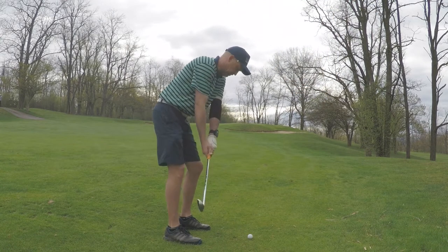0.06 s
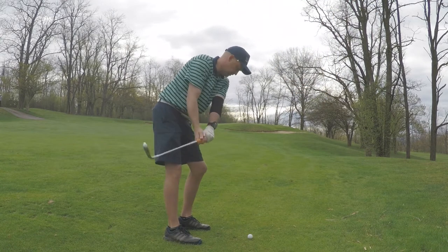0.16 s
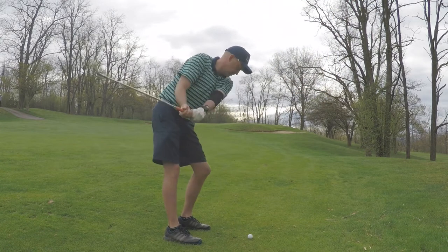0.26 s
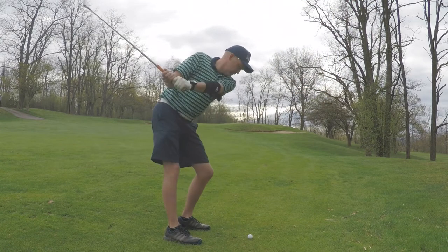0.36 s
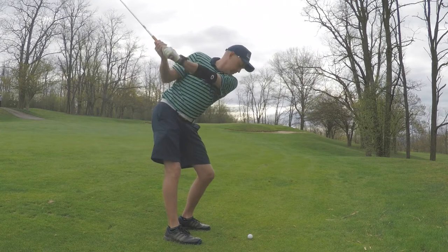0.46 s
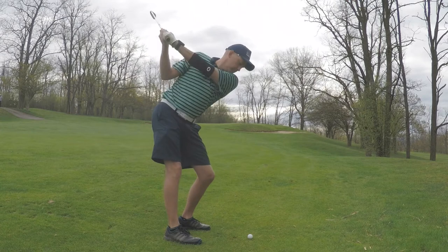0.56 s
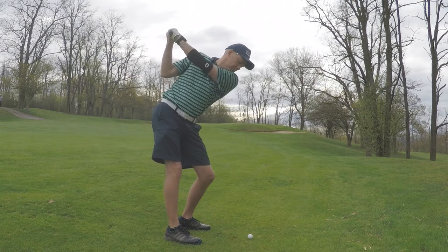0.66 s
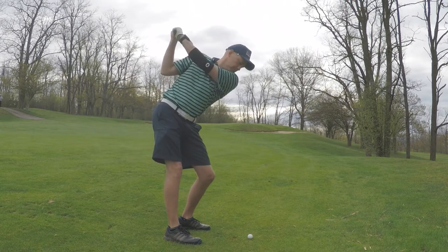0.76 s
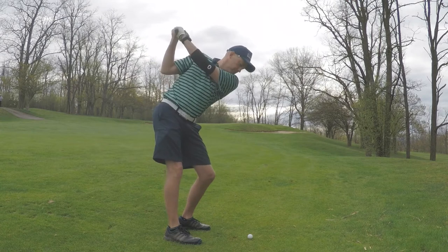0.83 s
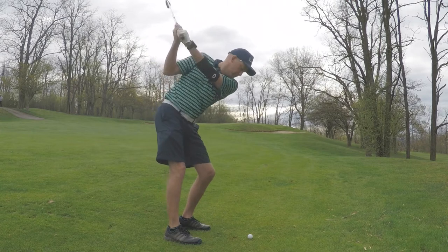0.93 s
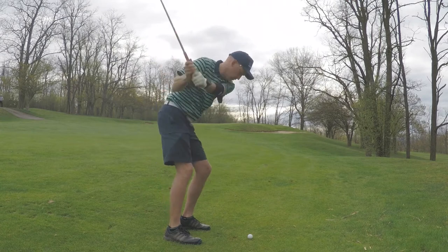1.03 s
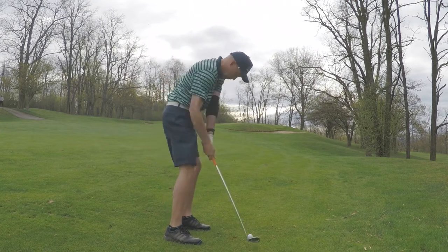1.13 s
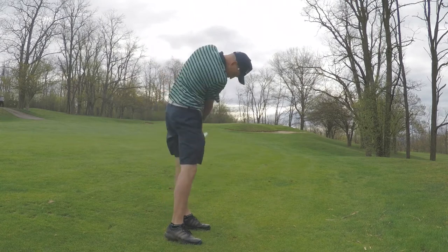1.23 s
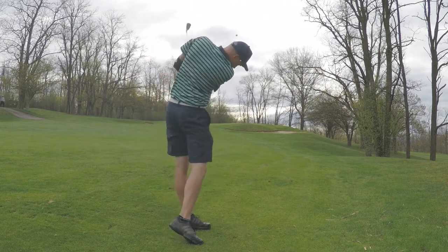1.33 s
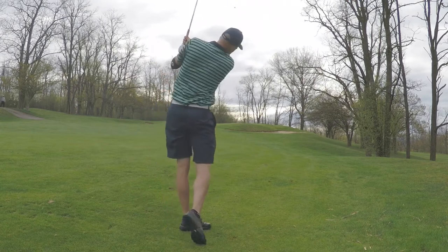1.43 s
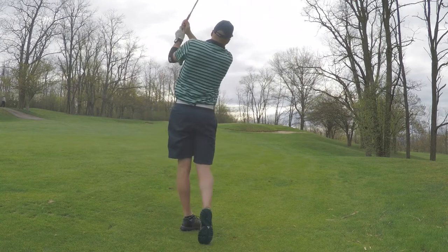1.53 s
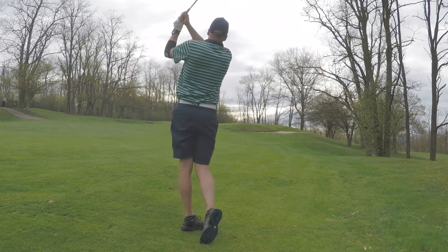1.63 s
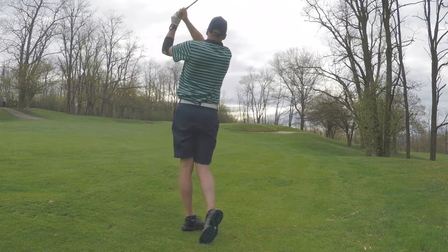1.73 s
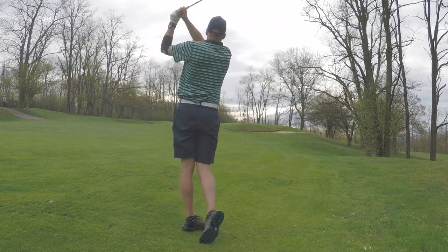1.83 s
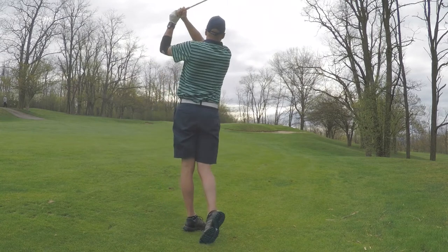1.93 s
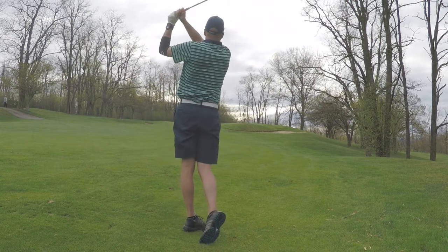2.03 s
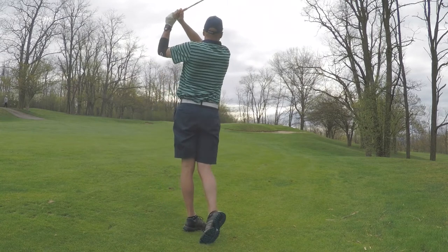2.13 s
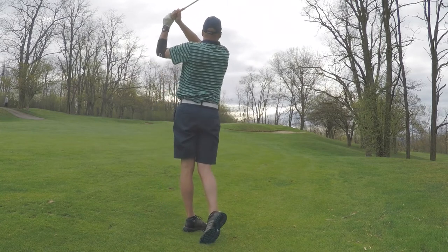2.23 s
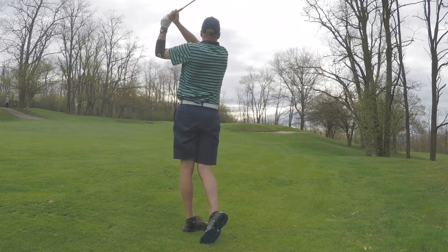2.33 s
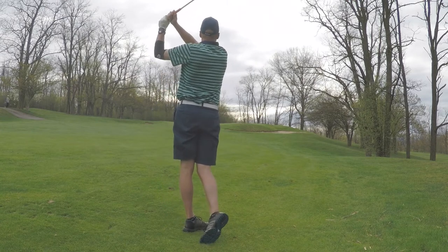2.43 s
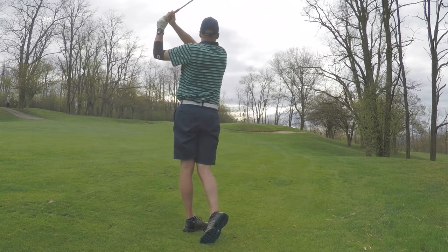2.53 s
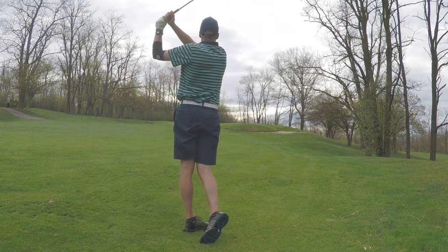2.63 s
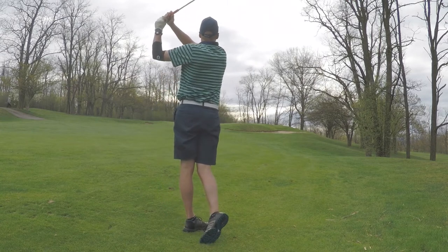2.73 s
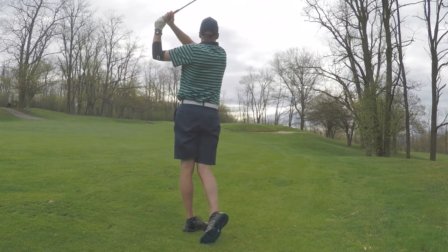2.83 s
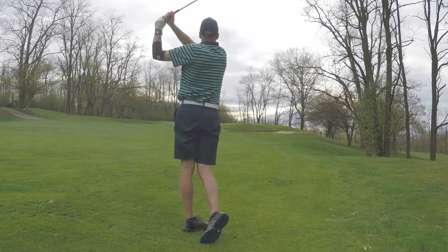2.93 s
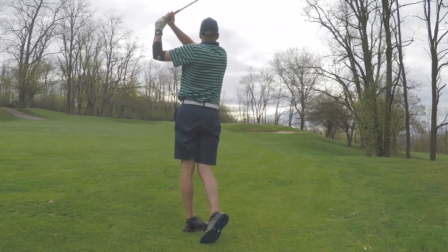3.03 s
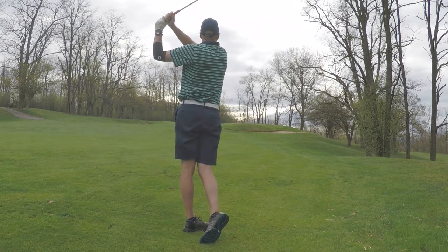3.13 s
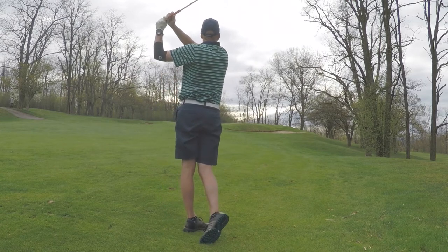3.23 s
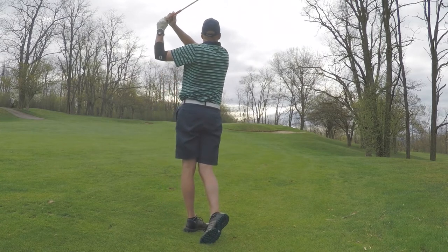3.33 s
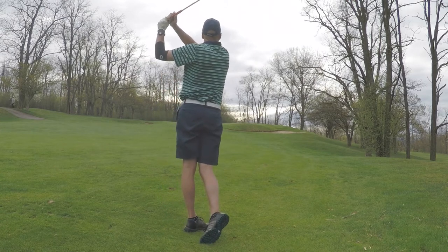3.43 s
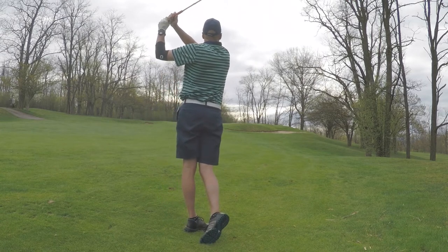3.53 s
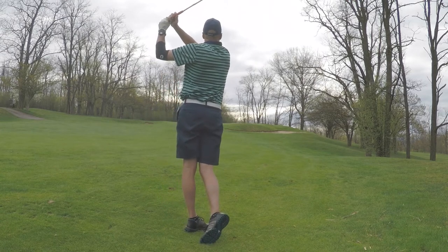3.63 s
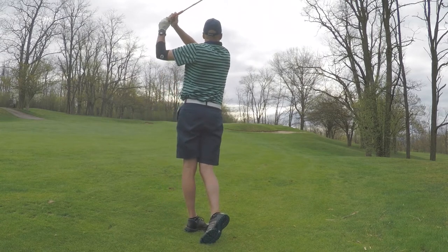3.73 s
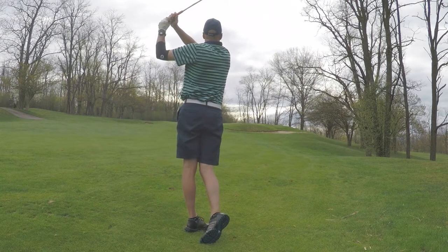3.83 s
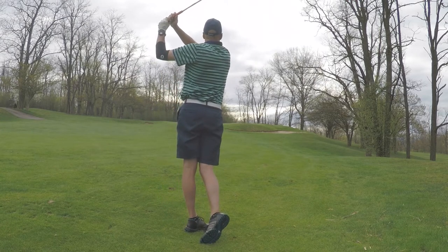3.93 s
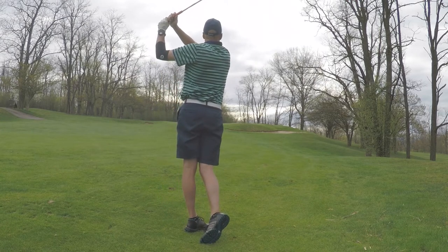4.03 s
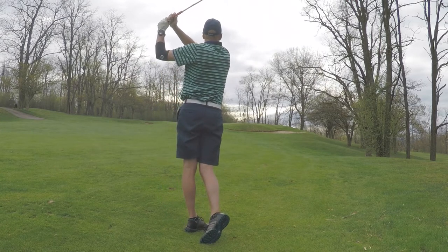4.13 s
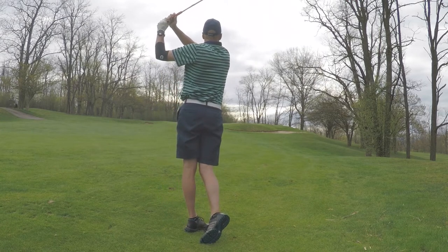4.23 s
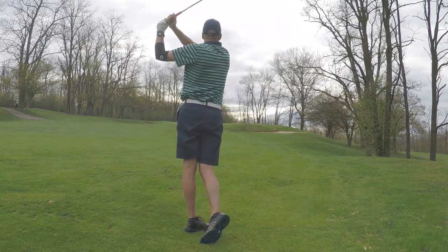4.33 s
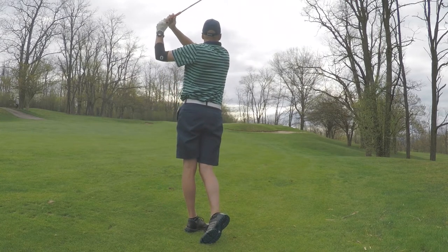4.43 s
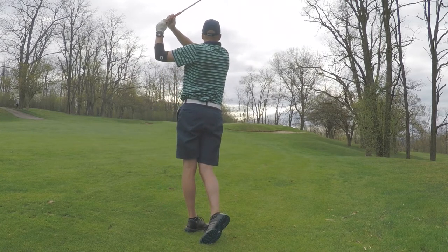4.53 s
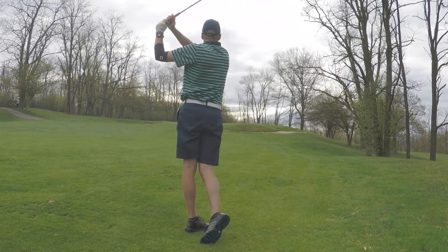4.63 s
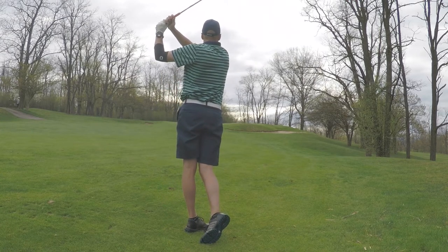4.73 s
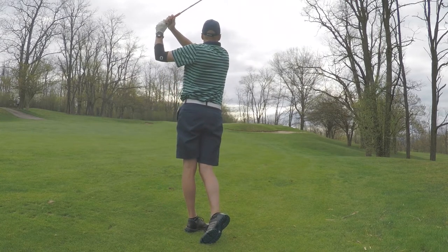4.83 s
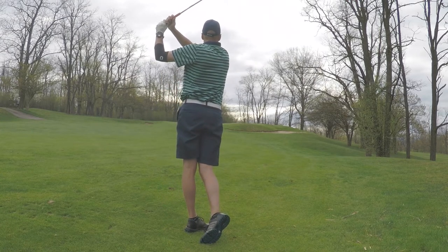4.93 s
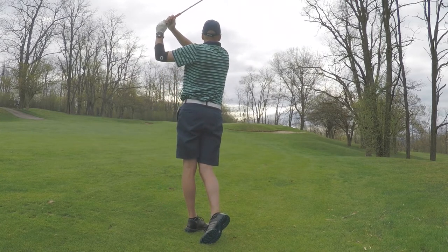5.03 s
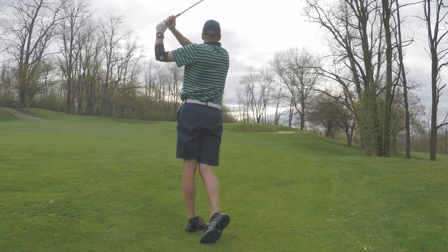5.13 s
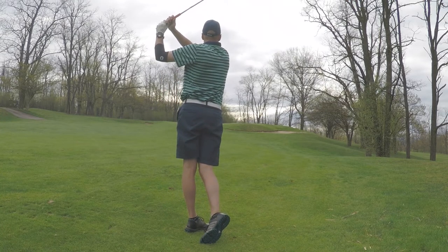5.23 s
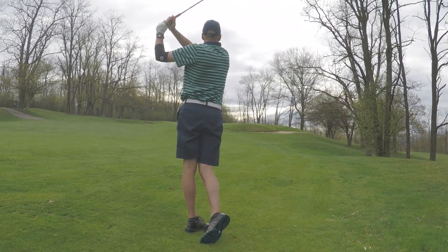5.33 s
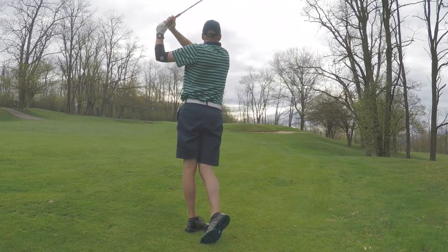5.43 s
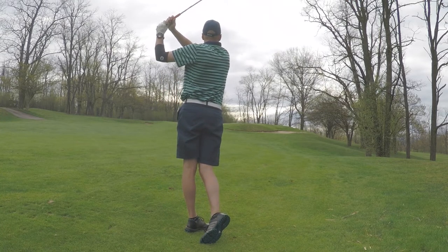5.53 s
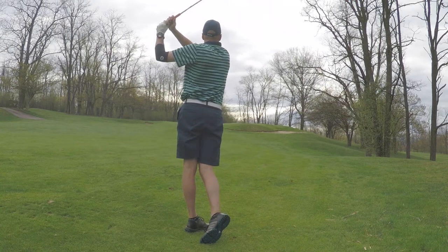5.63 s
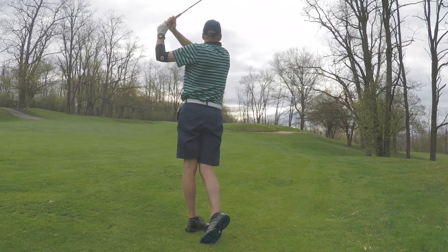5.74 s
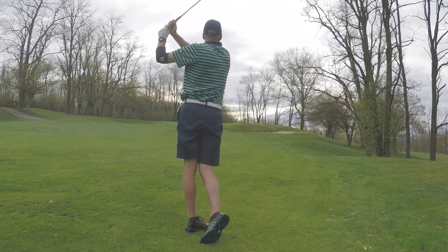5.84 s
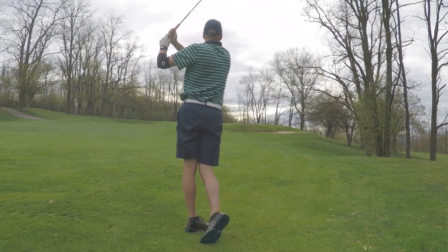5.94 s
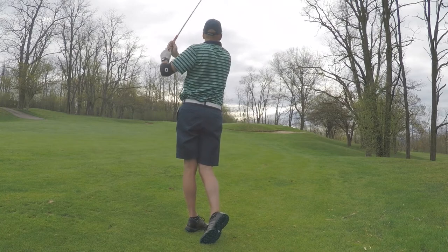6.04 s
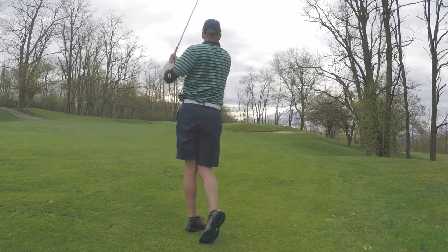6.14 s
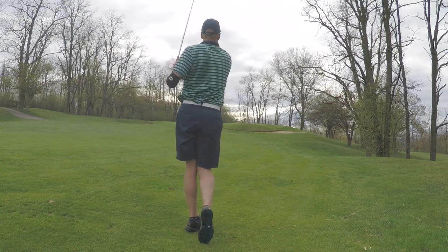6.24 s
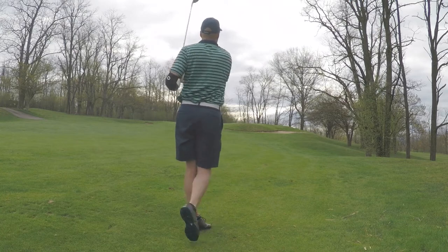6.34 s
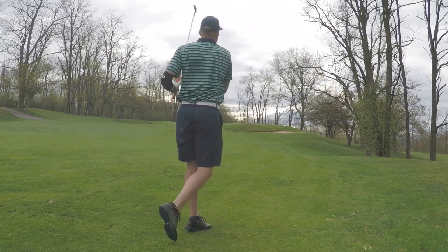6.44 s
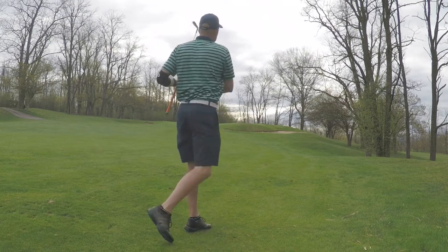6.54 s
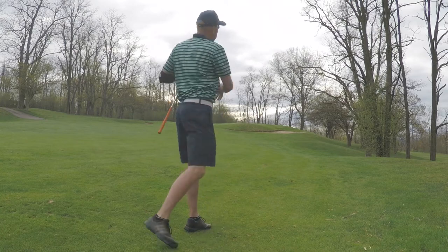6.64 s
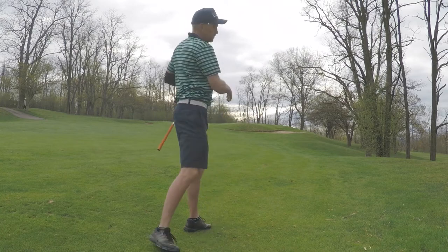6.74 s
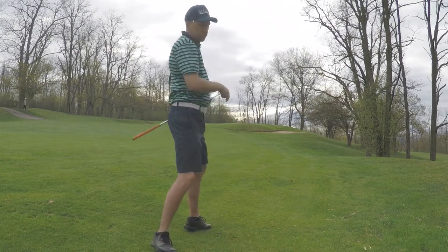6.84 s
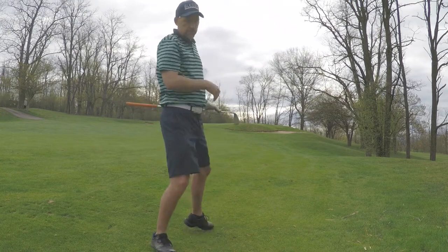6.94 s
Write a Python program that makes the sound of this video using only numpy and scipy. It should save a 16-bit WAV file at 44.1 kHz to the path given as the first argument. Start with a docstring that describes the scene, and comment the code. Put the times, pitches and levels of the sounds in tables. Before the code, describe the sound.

On a quiet open golf course, a quick swish ends in one hard, sharp click, followed by scattering turf, faint birds and distant engine drone.

```python
"""A swish and a hard click: a golf iron strikes a ball on an open fairway, a few metres from the microphones.
The contact is a shaped pulse plus decaying head modes; coloured noise makes the swish and the cut turf.
A low sine thumps, and grains of noise and single pulses make the spray and crumbs of soil and grass.
Birds are gliding sine notes, with far song and a faint echo among the trees. Off to the left, two far
engines, probably mowers, drone as wavering harmonics with two thin hums, under the noise of the open air."""
import sys
import numpy as np
from scipy import signal
from scipy.fft import rfft, irfft, next_fast_len
from scipy.io import wavfile
from scipy.ndimage import map_coordinates

SR = 44100
rng = np.random.default_rng(int(sys.argv[2]) if len(sys.argv) > 2 else 0)


def bounce(signal):
    """Save signal as a 16-bit WAV file at the path given by the first command-line argument."""
    frames = np.transpose(np.atleast_2d(signal))
    limited = np.clip(frames, -1, 1)
    pcm = np.round(limited * 32767).astype(np.int16)
    wavfile.write(sys.argv[1], SR, pcm)


N = 307377  # length in samples

IMPACT_S = 1.2101
# A faint early pulse, the full blow, then returns from ground and player:
# delay_s [s], relative level_db [dB]
PATHS = [(-.00045, -15.5), (0, 9), (.0018, -29), (.0030, -20), (.0041, -15), (.0076, -29)]
# Colour of the contact pulse: pitch_hz [Hz], relative density_db [dB per Hz]
CONTACT = [(40, -15), (250, 0), (900, 0.5), (1600, 7), (2300, -5.5), (2900, -9), (4000, 3), (5000, -17),
           (6200, -3), (8300, -5), (11000, -12.5), (15000, -22)]
# Ringing modes of club head and ball: pitch_hz [Hz], relative level_db [dB], t60_s [s]
HEAD_MODES = [(795, -10, 0.039), (1050, -15, 0.029), (1327, 0, 0.025), (1590, 2, 0.037), (1724, -7, 0.028),
              (2370, -5, 0.035), (3074, -14, 0.041), (3920, 1, 0.0207), (4400, -17, 0.02),
              (5740, -7.5, 0.024), (6120, -10, 0.022), (6900, -15, 0.029), (7070, -19, .026),
              (7800, -17, .028), (8350, -12, 0.022), (9300, -8, .022)]
# Colour of the cut turf: pitch_hz [Hz], relative density_db [dB per Hz]
CUT = [(100, -13), (280, 2), (500, -7), (900, -2.5), (1600, 2), (2800, -16.5), (4200, -13.5), (5000, -11.5),
       (7500, -13), (10500, -14.5), (15000, -27)]


def strike():
    """A brief contact rings head and ball as damped modes; noise of cut turf surrounds the blow and soon dies."""
    t = np.arange(SR // 5) / SR
    shot = np.zeros(N)
    for delay, db in PATHS:
        add(shot, IMPACT_S + delay, amp(db - 7.5) * pulse(CONTACT))
    ring = np.zeros(len(t))
    for k, (hz, db, t60) in enumerate(HEAD_MODES):
        # neighbouring modes swing in opposite directions
        ring += (-1) ** k * amp(db - 60 * t / t60) * np.sin(2 * np.pi * hz * t)
    # the soil damps the head once it has dug in
    buried = amp(-60 * np.maximum(t - .009, 0) / .02)
    onset = 1 - np.exp(-t / 0.0005)
    add(shot, IMPACT_S, amp(-20.5) * ring * buried * onset)
    cut = turf() * noise(CUT)
    return placed(shot + cut, lead_ms=0.032)


# Cutting noise: a steep few-millisecond rise, a sagging hold, a quick release
TURF_LEAD_S, TURF_RISE_S, TURF_DB = .0002, .004, -23.5
TURF_HOLD_S, TURF_SAG_DB, TURF_RELEASE_S = 0.0099, 6.5, .018


def turf():
    """Level of the cutting noise: a steep rise to its peak near the blow, a sagging hold, a quick release."""
    steps = np.array([-TURF_RISE_S, 0, TURF_HOLD_S, TURF_HOLD_S + TURF_RELEASE_S])
    times = IMPACT_S - TURF_LEAD_S + steps
    levels = [-60, 0, -TURF_SAG_DB, -TURF_SAG_DB - 60]
    db = np.interp(clock(), times, levels, left=-np.inf, right=-np.inf)
    return amp(TURF_DB + db)


def thump(hz=90, t60=0.22, db=-27.5):
    """The blow to the ground leaves a low, dying throb."""
    age = np.maximum(clock() - 1.222, 0)
    onset = 1 - np.exp(-age / 0.00216)
    throb = -amp(db - 60 * age / t60) * np.sin(2 * np.pi * hz * age) * onset
    return placed(throb, lead_ms=0.029)


# Air torn by the shaft, and the hiss shared with the grass: pitch_hz [Hz], relative density_db [dB per Hz]
SWISH = [(100, -20), (300, -3), (480, 0), (900, -7), (1600, -6), (3500, -16), (6000, -26), (14000, -40)]
GRASS = [(300, -15), (1000, 0), (2500, -1), (4500, -2), (7000, -3.5), (10000, -9.5), (15000, -21)]
# Downswing: moment of top speed, width (standard deviation) of the rush, level of the low whoosh
SWING_S, SWING_WIDTH_S, SWING_DB = 1.178, .027, -47


def swish(hiss_db=-17):
    """Eddies flutter off the shaft; their hiss grows faster with speed than their low whoosh."""
    speed = bell(SWING_S, SWING_WIDTH_S)
    hiss = amp(hiss_db) * speed * noise(GRASS)
    flutter = unit(amp(2 * wobble(160)))
    rush = amp(SWING_DB) * speed * flutter * (noise(SWISH) + hiss)
    return placed(rush, lead_ms=0.036)


# Scuffs in the grass: centre_s [s], level_db [dB], width_s [s, standard deviation]
SCUFFS = [(.47, -69, .009), (1.349, -52, 0.012), (1.363, -52, 0.0057), (1.4, -60, .005),
          (1.427, -56.5, 0.0087), (1.457, -54, 0.006), (6.49, -68, 0.03)]
# Colour of a scuff: pitch_hz [Hz], relative density_db [dB per Hz]
SCUFF = [(300, -27), (1200, -6), (2800, 4), (4000, -2), (5500, -8), (8000, -30), (15000, -36)]
# Crumbs of soil landing: start_s [s], peak_db [dB]
CRUMBS = [(1.5728, -34.5), (1.5908, -45), (1.6631, -44)]
# Colour of a crumb: pitch_hz [Hz], relative density_db [dB per Hz]
CRUMB = [(500, -25), (2000, -4), (4000, -1), (8000, -1), (15000, -12)]
# Flying soil and grass: time from the blow to the thickest spray, level there
SPRAY_PEAK_S, SPRAY_DB = 0.055, -54


def divot():
    """Soil and grass spray out in grains, brush the ground and land as single crumbs."""
    age = np.maximum(clock() - IMPACT_S, 0) / SPRAY_PEAK_S
    clumps = amp(2 * wobble(500) + 1.5 * wobble(90))
    grit = patter(GRASS, per_s=1000, spread_db=4.5)
    blades = patter(SCUFF, per_s=1800, spread_db=3)
    rise_and_fall = age * np.exp(1 - age)
    spray = amp(SPRAY_DB) * rise_and_fall * unit(clumps * (grit + 0.93 * diffuse(GRASS)))
    brush = sum(amp(db) * bell(s, width) for s, db, width in SCUFFS)
    crumbs = np.zeros(N)
    for s, db in CRUMBS:
        add(crumbs, s, amp(db) * pulse(CRUMB))
    return placed(spray + brush * unit(clumps * blades) + crumbs, lead_ms=0.047)


def patter(spectrum, per_s, spread_db):
    """Tiny impacts of unequal size at random moments, rms 1."""
    struck = rng.random(N) < per_s / SR
    sizes = amp(spread_db * rng.standard_normal(N))
    hits = struck * rng.choice([-1, 1], N) * sizes
    return unit(signal.fftconvolve(hits, pulse(spectrum))[:N])


# Notes that climb, then drop, levels before flutter:
# start_s [s], climb_s [s], top_hz [Hz], climb_rate [Hz per s], level_db [dB]
ARCHES = [(.712, .073, 3450, 16360, -57.5), (2.411, .052, 3360, 7100, -61.5),
          (2.443, 0.02, 7350, 60600, -64), (2.922, .043, 3200, 12100, -60.5),
          (4.183, .045, 3150, 5950, -61)]
# Notes that slide or stay nearly level, levels before flutter:
# start_s [s], length_s [s], start_hz [Hz], end_hz [Hz], level_db [dB]
SLURS = [(0.136, .06, 2780, 2580, -71), (.14, 0.058, 3370, 3490, -72), (1.212, 0.097, 3650, 2210, -56.5),
         (1.35, .05, 2900, 2490, -58), (2.05, .055, 2760, 2520, -70), (2.971, 0.044, 2990, 2910, -59),
         (3.03, 0.048, 3030, 2570, -63.5), (3.085, .057, 2220, 2030, -65), (3.571, .022, 3250, 2770, -63),
         (3.689, 0.056, 3230, 3000, -65), (4.25, 0.041, 2980, 2970, -63.5), (4.312, .07, 2600, 2220, -66),
         (4.872, .052, 3240, 2950, -66.5), (4.939, 0.093, 2770, 2774, -65.5),
         (5.445, .041, 3300, 3000, -67), (6.235, 0.052, 2640, 2590, -70), (6.459, 0.064, 3380, 2380, -67),
         (6.72, 0.14, 2520, 2450, -70.5), (6.856, 0.066, 2650, 2540, -65.5), (6.825, .033, 4930, 5100, -61),
         (6.865, 0.023, 4850, 4730, -64), (6.897, 0.033, 5100, 5000, -67)]
# A run of falling chirps, each later, fainter and on average lower than the one before
RUN_S, RUN_HZ, RUN_DB = 1.728, 3500, -64.8
RUN_GAP_S, RUN_SLOWING = .039, 1.12  # each gap is longer by this factor
RUN_STEP_HZ, RUN_FADE_DB = 105, .4
CHIRP_S, CHIRP_FALL_HZ = .043, 620
WHISTLE_S, WHISTLE_DB = 6.522, -61


def birds(count=7, flutter_db=2.1, pitch_scatter_hz=70):
    """The nearer birds: arched and slurred notes, a run of chirps and one long, smooth whistle."""
    song = np.zeros(N)
    for s, *shape, db in ARCHES:
        add(song, s, amp(db) * arch(*shape))
    for s, *shape, db in SLURS:
        add(song, s, amp(db) * slur(*shape))
    s = RUN_S
    for k in range(count):
        hz = RUN_HZ - k * RUN_STEP_HZ + pitch_scatter_hz * rng.uniform(-1, 1)
        chirp = slur(CHIRP_S, hz, hz - CHIRP_FALL_HZ)
        add(song, s, amp(RUN_DB - k * RUN_FADE_DB) * chirp)
        s += RUN_GAP_S * RUN_SLOWING ** k
    song = song * amp(flutter_db * wobble(70))
    add(song, WHISTLE_S, amp(WHISTLE_DB) * whistle())
    return placed(song, lead_ms=0.048)


def note(hz):
    """A pure whistle along a pitch path, swelling and fading once."""
    swell = np.abs(np.sin(np.linspace(0, np.pi, len(hz)))) ** 0.54
    return np.sqrt(2) * swell * np.sin(2 * np.pi * np.cumsum(hz) / SR)


DROP_S, DROP_HZ_PER_S = .027, 36000


def arch(climb, top_hz, climb_rate):
    """A note that climbs to its top pitch and drops away."""
    t = np.arange(int((climb + DROP_S) * SR)) / SR - climb
    return note(top_hz + np.minimum(climb_rate * t, -DROP_HZ_PER_S * t))


SLUR_EASE = .85  # under 1: the slide is steepest at the start


def slur(length, start_hz, end_hz):
    """A note that slides from one pitch to another."""
    progress = np.linspace(0, 1, int(length * SR)) ** SLUR_EASE
    return note(start_hz + (end_hz - start_hz) * progress)


WHISTLE_LENGTH_S, WHISTLE_SINK_S = .355, .1
WHISTLE_START_HZ, WHISTLE_END_HZ = 5500, 4970


def whistle(waver=.0025):
    """A long, slightly wavering note that sinks ever more slowly."""
    t = np.arange(int(WHISTLE_LENGTH_S * SR)) / SR
    hz = WHISTLE_END_HZ + (WHISTLE_START_HZ - WHISTLE_END_HZ) * np.exp(-t / WHISTLE_SINK_S)
    return note(hz * (1 + waver * wobble(72)[:len(t)]))


# Decay among the trunks: pitch_hz [Hz], t60_s [s]
TREES = [(200, .3), (2500, 0.59), (5000, 0.35), (9000, 0.29)]


def trees(x):
    """Trunks scatter a thin, late tail: noise that builds up, then decays at its own rate in each band."""
    hz, t, z = signal.stft(rng.standard_normal((2, SR)), SR, nperseg=256)
    decay = amp(-60 * t / along(TREES, hz)[:, None])
    buildup = 1 - np.exp(-t / 0.032)
    tail = signal.istft(z * decay * buildup, SR, nperseg=256)[1]
    return signal.fftconvolve(x, tail / np.linalg.norm(tail[0]), axes=1)[:, :N]


# Colour of far birdsong blurred by the wood: pitch_hz [Hz], relative density_db [dB per Hz]
BLUR = [(900, -27), (1700, -3), (2400, 3), (3200, 2.5), (3700, -9.5), (4800, -9), (6000, -40), (12000, -36)]
# Bouts of far birdsong: centre_s [s], width_s [s, standard deviation], level_db [dB]
BOUTS = [(3.1, 0.16, -71), (4.3, 0.48, -63.5), (5.55, 0.14, -68.5)]
# Under the bouts the far song grows from a lull to a steady level
LULL_DB, CHORUS_DB, LULL_ENDS_S = -77, -70.5, 2.2


def chorus(count=130):
    """Many far notes, smeared by the wood into a twittering wash that swells in bouts."""
    far = np.zeros(N)
    for when, length, pitch, slide, size in rng.random((count, 5)):
        hz = 2400 + 950 * pitch
        call = slur(0.0302 + .055 * length, hz, hz * (1 - 0.1695 * slide))
        add(far, when * N / SR, amp(9.7 * size) * call)
    twitter = unit(placed(far, lead_ms=0) + trees(far[None]))
    wash = placed(diffuse(BLUR), lead_ms=-0.077)
    steady = amp(np.interp(clock(), [0, LULL_ENDS_S], [LULL_DB, CHORUS_DB]))
    bouts = sum((amp(db) * bell(s, width)) ** 2 for s, width, db in BOUTS)
    level = np.sqrt(steady ** 2 + bouts)
    return level * (0.51 * twitter + 1.01 * wash)


# Upper orders of an engine: multiple [of the firing rate], relative level_db [dB]
OVERTONES = [(2, -1.5), (3, -16.5), (4, -19), (5, -28.5), (7, -32)]


def mower(speed, db, overtone_db, db_per_hz=0, overtone_db_per_hz=0):
    """A far engine's low orders, fading on the breeze; the per-Hz settings strengthen them as it revs."""
    hz, = curves(speed)
    revs = hz - hz.mean()
    phase = 2 * np.pi * np.cumsum(hz * (1 + 0.0025 * wobble(7))) / SR

    def tone(k):
        return np.sqrt(2) * np.sin(k * phase + 2 * np.pi * rng.random())

    upper = sum(amp(level + 0.88 * wobble(5.6)) * tone(k) for k, level in OVERTONES)
    firing = amp(db + db_per_hz * revs + 1.63 * wobble(4.9)) * tone(1)
    return firing + amp(overtone_db + overtone_db_per_hz * revs) * upper


# Engine speeds before their small waver: time_s [s], firing_hz [Hz]
STEADY_MOWER = [(0, 84.9), (.7, 86.2), (3.3, 86), (4.4, 87), (6.97, 87)]
ROVING_MOWER = [(0, 94.27), (1.8, 97.44), (2.35, 72.93), (3.2, 70.96), (6.97, 81.03)]
# Thin hums: mean pitch_hz [Hz], level_db [dB, before a common 1.5 dB lift and a waver]
HUMS = [(120.5, -61), (556, -68.5)]


def drone():
    """Both engines and two thin wavering hums, off to the left."""
    hums = np.zeros(N)
    for hz, db in HUMS:
        level = amp(db + 1.5 + 1.8 * wobble(4.05))
        hums += level * np.sin(2 * np.pi * np.cumsum(hz + 1.27 * wobble(12)) / SR)
    steady = mower(STEADY_MOWER, db=-53, overtone_db=-50.0)
    roving = mower(ROVING_MOWER, db=-52.5, overtone_db=-68.5, db_per_hz=0.2342, overtone_db_per_hz=0.76)
    return placed(steady + roving + hums, lead_ms=-.07)


# Colour of the open air: pitch_hz [Hz], relative density_db [dB per Hz]
AIR = [(10, -10), (25, 3), (55, 3), (90, 0), (140, -6.5), (220, -13.5), (400, -20.5), (750, -20.5),
       (1300, -26), (2200, -30), (4000, -36), (7000, -41), (15000, -43.5)]


def air():
    """Low rumble and faint hiss of the open course, as gently wavering noise."""
    floor = amp(-48.5 + 0.55 * wobble(2.93)) * diffuse(AIR)
    return placed(floor, lead_ms=-.07)


# Likeness of left and right in sound from all round: pitch_hz [Hz], correlation [0 to 1]
ALIKE = [(60, 0.89), (200, 0.68), (500, 0.71), (1400, 0.72), (3000, 0.223), (7000, 0.073)]


def diffuse(spectrum):
    """Stereo noise from all round: alike in the bass, nearly unrelated in the treble."""
    def mid_side_gains(hz):
        angle = np.arccos(np.clip(along(ALIKE, hz), -1, 1)) / 2
        return np.array([np.cos(angle), np.sin(angle)])

    mid, side = filtered(np.array([noise(spectrum), noise(spectrum)]), mid_side_gains)
    return unit(np.array([mid + side, mid - side]))


def placed(x, lead_ms):
    """A source on the right reaches the right microphone sooner; a negative lead puts it on the left."""
    ears = np.array([[-1], [1]])
    return filtered(x, lambda hz: np.exp(1j * np.pi * hz * ears * lead_ms / 1000))


def amp(db):
    """Decibels to gain."""
    return 10 ** (np.asarray(db) / 20)


def unit(x):
    """Scale to rms 1."""
    return x / np.sqrt(np.mean(x ** 2) + 1e-20)


def clock():
    """The time of each sample in seconds."""
    return np.arange(N) / SR


def bell(s, width):
    """A smooth swell of height 1 around time s."""
    return np.exp(-.5 * ((clock() - s) / width) ** 2)


def along(points, hz):
    """Interpolate (Hz, value) points on a log frequency axis."""
    f, v = np.transpose(points)
    return np.interp(np.log(hz + 1), np.log(f + 1), v)


def curves(rows):
    """One value per sample for each column after the time."""
    s, *cols = np.transpose(rows)
    return [np.interp(clock(), s, c) for c in cols]


def wobble(rate):
    """A smooth random curve, rate knots a second."""
    knots = rng.standard_normal(int(N * rate / SR) + 4)
    return map_coordinates(knots, [clock() * rate])


def filtered(x, response):
    """x times a complex response of frequency."""
    m = next_fast_len(N + SR // 2)
    return irfft(rfft(x, m) * response(np.fft.rfftfreq(m, 1 / SR)), m)[..., :N]


def noise(spectrum):
    """Coloured noise of rms 1."""
    return unit(filtered(rng.standard_normal(N), lambda hz: amp(along(spectrum, hz))))


def pulse(spectrum, size=1024):
    """A causal pulse of peak 1: folding the cepstrum gives the colour its minimum phase."""
    cepstrum = irfft(np.log(amp(along(spectrum, np.fft.rfftfreq(size, 1 / SR)))))
    cepstrum[1:size // 2] *= 2
    cepstrum[size // 2 + 1:] = 0
    shape = irfft(np.exp(rfft(cepstrum)))
    return shape / np.abs(shape).max()


def add(track, s, sound):
    """Mix a sound into a track at time s."""
    part = track[max(round(s * SR), 0):][:len(sound)]
    part += sound[:len(part)]


def scene():
    """The near shot is almost dry; the birds sit among the trees."""
    shot, song = strike(), birds()
    echoes = trees(amp(-34.5) * shot + amp(-12.0) * song)
    return shot + thump() + swish() + divot() + song + echoes + chorus() + drone() + air()


# Balance of the two microphones: pitch_hz [Hz], right_minus_left_db [dB]
MICROPHONES = [(20, 3), (100, 2), (600, 1), (2000, 1), (4000, -0.5), (15000, 0)]
TOP_HZ = 15150  # the steep upper limit of the treble


def record(dry):
    """The right microphone is a little stronger in the bass; loud peaks are rounded and the top is cut."""
    halves = np.array([[-.5], [.5]])
    heard = filtered(dry, lambda hz: amp(halves * along(MICROPHONES, hz)))
    rounded = heard / (1 + np.abs(heard / .75) ** 6) ** (1 / 6)
    return filtered(rounded, lambda hz: 1 / np.sqrt(1 + (hz / TOP_HZ) ** 160))


dry = scene()
out = record(dry)
bounce(out)
```